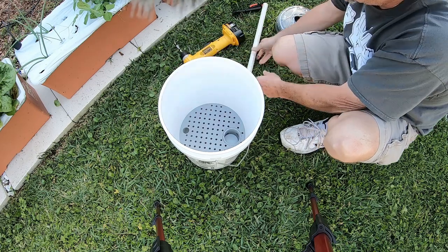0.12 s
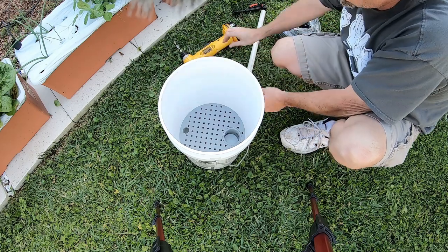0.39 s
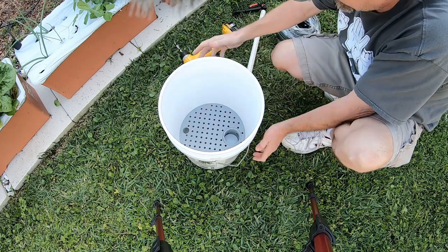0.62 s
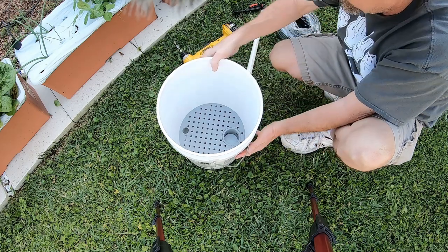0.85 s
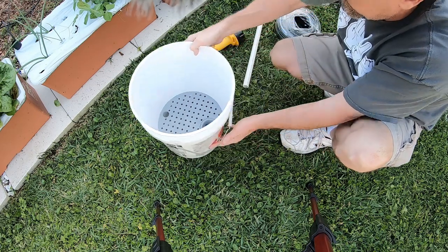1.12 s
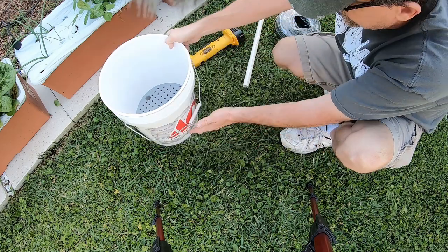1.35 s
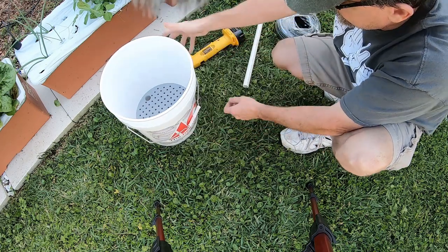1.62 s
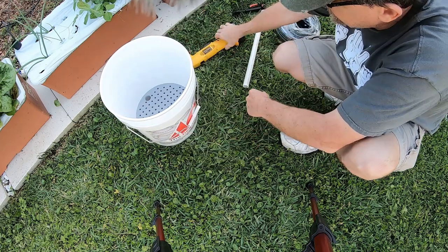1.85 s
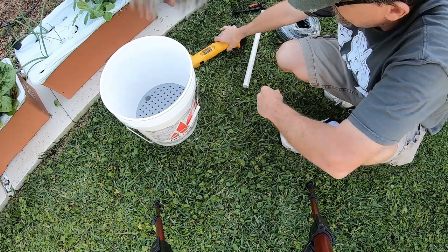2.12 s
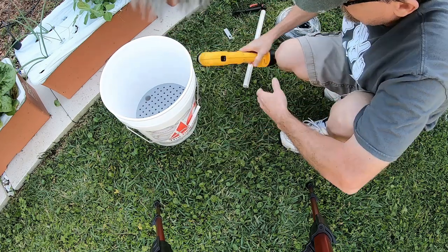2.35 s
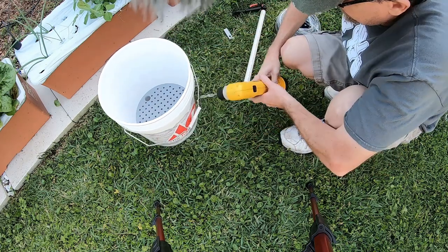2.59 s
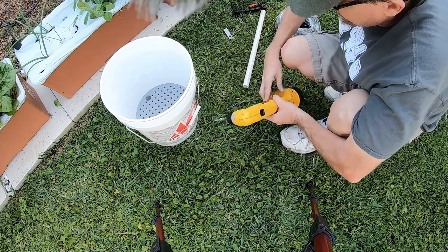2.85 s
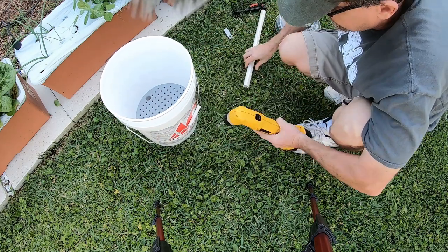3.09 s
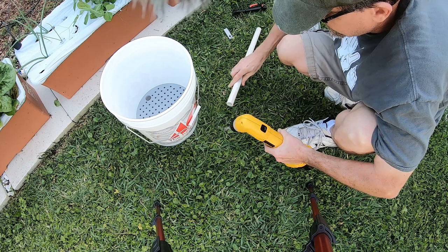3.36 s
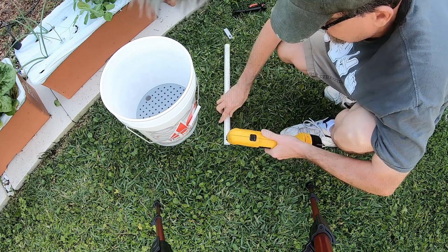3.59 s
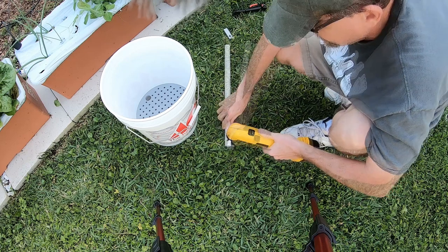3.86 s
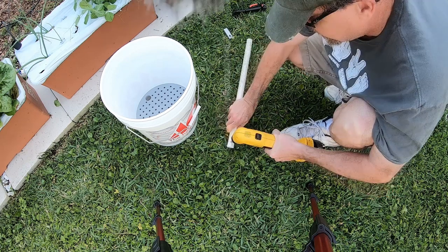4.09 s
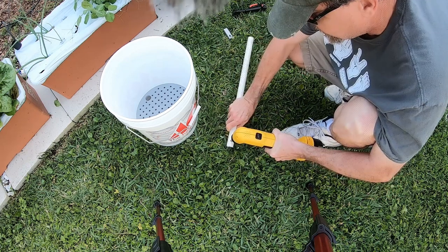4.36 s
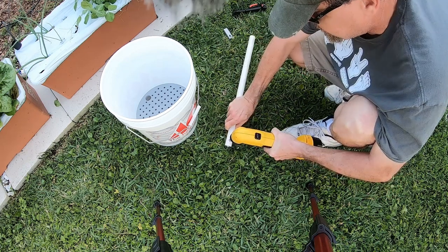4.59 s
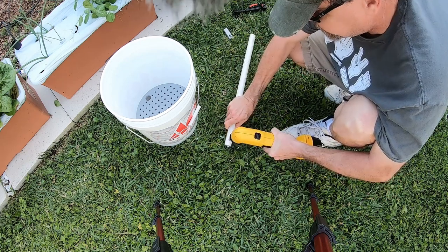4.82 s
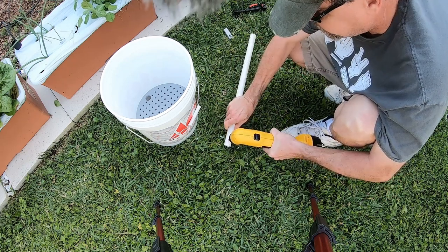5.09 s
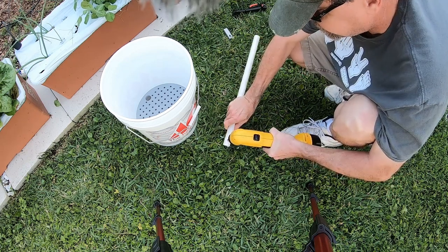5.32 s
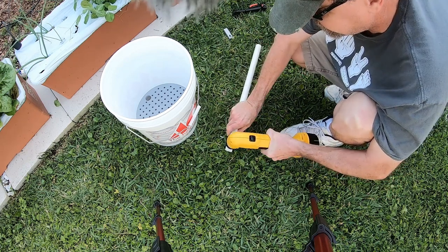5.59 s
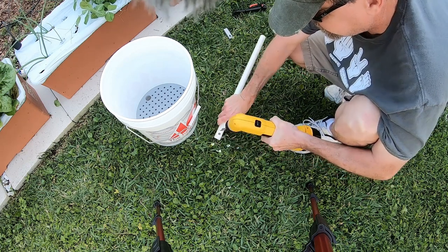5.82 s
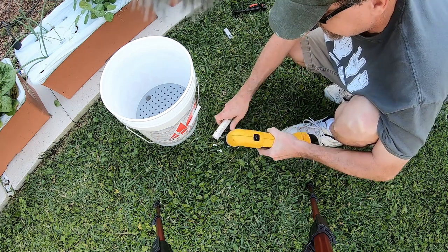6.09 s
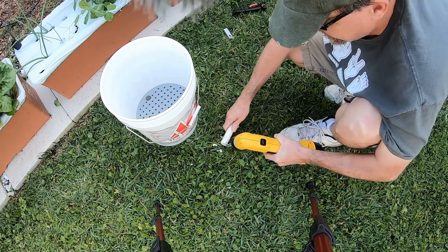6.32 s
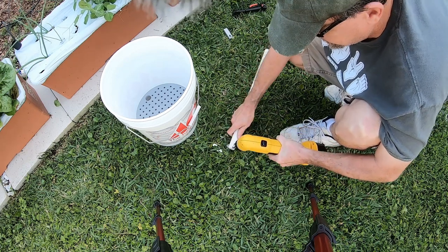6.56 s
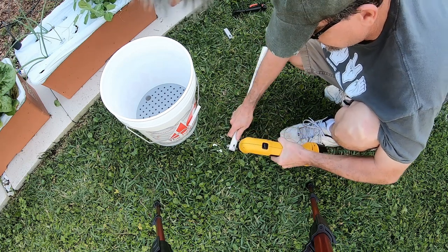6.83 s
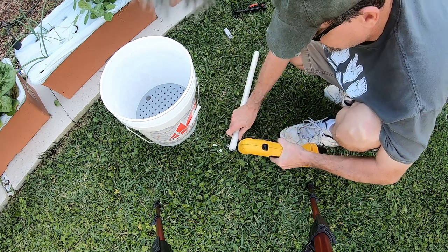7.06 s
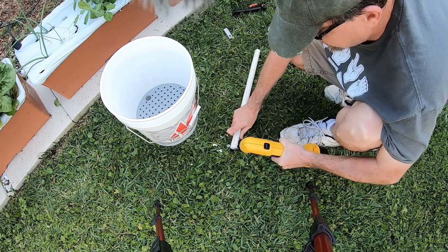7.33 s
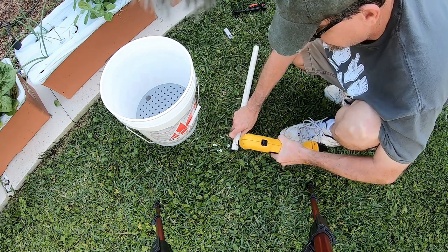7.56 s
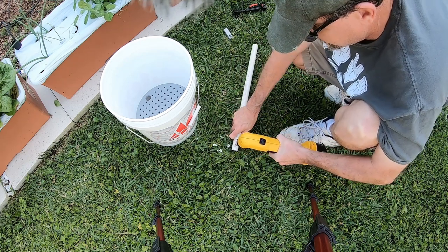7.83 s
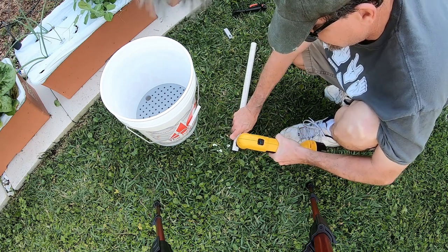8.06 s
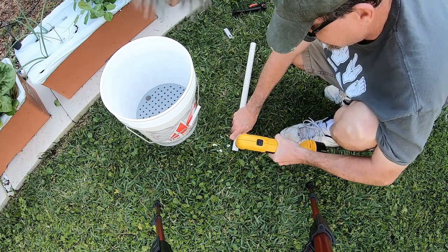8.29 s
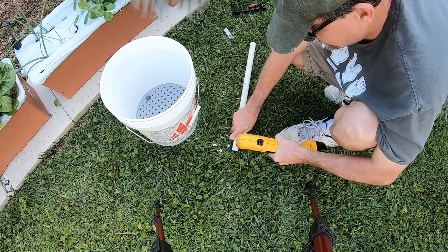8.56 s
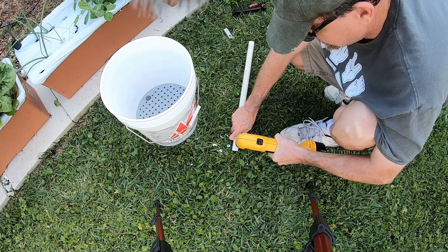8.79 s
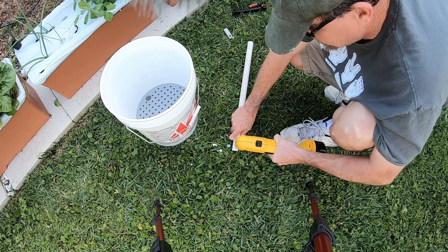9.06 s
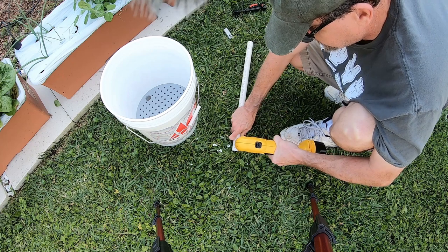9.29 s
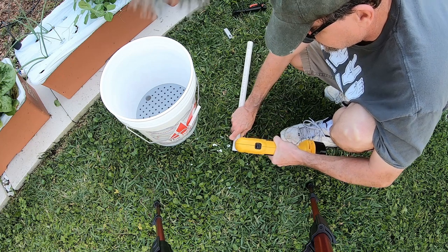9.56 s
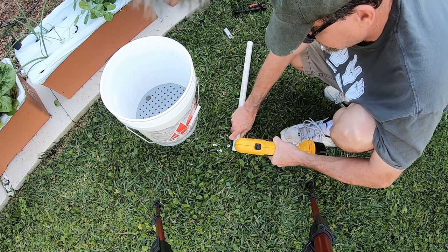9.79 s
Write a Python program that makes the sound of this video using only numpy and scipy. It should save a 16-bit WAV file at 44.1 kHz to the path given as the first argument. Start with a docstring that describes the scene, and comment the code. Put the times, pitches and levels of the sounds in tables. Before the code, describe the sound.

Outdoors on a lawn, close bare microphone, faint distant wash and machine hum, with low wind buffeting throughout. From 0.2 s grass and cloth crackle softly; at 0.9-1.7 s a plastic bucket gives hollow knocks and scuffs. A bright tap at 2.2 s leads to a loud, dense clatter of hard parts at 2.6-2.8 s, then small taps near 3 s and 3.5 s. At 3.96 s a low pop coincides with the abrupt start of a cordless drill, a loud, rough, high gear whine boring plastic. Wind rumble is strongest around 4-5.5 s. At 5.5-5.7 s the drill labours and its pitch dips, recovers, and it breaks through near 5.84 s. From 6 s it coasts, falling in pitch and loudness into a loose rattle, stopping around 8.6 s. Tiny ticks follow, and from 9 s it restarts slowly with thin electronic whines, growling upward until the end.

```python
"""A cordless drill on a lawn bores a plastic pipe, labours, breaks through, coasts down, later starts again:
shaft-beaten noise rings in the body under gear, commutator and shaft tones, with short gliding whine notes.
Before that a plastic bucket and tools are handled: ringing knocks, crackling rustle, one loud dense clatter.
Wind buffets the bare microphone over a distant wash and hum; one low pop sounds, a step that dies away; the
ground gives every near sound a short echo."""
import sys
import numpy as np
from scipy import signal
from scipy.io import wavfile
from scipy.ndimage import uniform_filter1d

SR = 44100
rng = np.random.default_rng(int(sys.argv[2]) if len(sys.argv) > 2 else 0)


def attenuation_scalar(level_db):
    """Turn a level in dB into a linear amplitude multiplier (20 dB per decade)."""
    decades = np.asarray(level_db, float) / 20
    return 10 ** decades


def log_audio(samples):
    """Write samples as a 16-bit WAV file to the path given in sys.argv[1]."""
    # one column per channel
    frames = np.atleast_2d(samples).T
    # limit to full scale, then quantise
    limited = np.clip(frames, -1, 1)
    pcm = np.round(limited * 32767).astype(np.int16)
    wavfile.write(sys.argv[1], SR, pcm)


N = 437472

# distant wash: hz, level_db_per_hz
YARD_SPECTRUM = [(88, -32.5), (150, -11.5), (439, -5.5), (534, -9), (624, -8), (745, -9), (1450, -12),
                 (1530, -12.5), (1830, -16.5), (5570, -19.5), (16000, -31.5)]
YARD_DB = -61.5
# hum of a far machine: pitch_hz, level_db
HUM_TONES = [(242.2, -75), (414.5, -75), (532.9, -75.5), (769.8, -76.5), (1120, -78), (1577, -74.5)]
# wind on the microphone: time_s, slow_pressure_db, rumble_db
WIND_CURVE = [(0.03, -10.5, -36), (0.5, -31.5, -59), (1.32, -34.5, -51), (1.43, -15, -42), (1.57, -13, -46),
              (1.84, -14.5, -31.5), (3.19, -11, -47), (3.5, -11.5, -46.5), (3.94, -15, -33),
              (4.21, -16.5, -29.5), (4.35, -26, -21.5), (4.62, -11.5, -23.5), (4.82, -15, -23.5),
              (5.42, -10, -28), (5.59, -16, -29.5), (6.14, -14, -46), (6.39, -23, -43.5),
              (6.91, -11, -38.5), (8.59, -24.5, -55.5), (8.89, -19.5, -54), (9.09, -29, -51.5),
              (9.56, -14.5, -52), (9.67, -17, -43), (9.91, -33, -56)]
# wind rumble: hz, level_db_per_hz
RUMBLE_SPECTRUM = [(11, -42), (18, 3.5), (65, -16.5), (102, -19.5), (300, -43.5), (390, -71), (660, -120)]
# low pop, a step that dies away: time_s, step_db, decay_s
STEP_POP = (3.9584, -5, 0.036)

# strokes over grass and cloth: peak_s, rise_s, fall_s, crisp_db, hollow_db; rise and fall span 20 dB
RUSTLE_STROKES = [(0.2, 0.054, 0.2, -58, -63), (0.286, 0.027, 0.027, -49.5, -69),
                  (1.03, 0.2, 0.25, -73, -52), (1.116, 0.26, 0.16, -62.5, -53), (1.178, 0.1, .07, -73, -46),
                  (1.399, 0.26, .2, -50, -43), (1.62, 0.06, 0.19, -64.5, -46.5),
                  (1.89, 0.065, 0.39, -79, -59), (2.191, 0.036, 0.24, -57.5, -64),
                  (2.979, 0.11, 0.13, -59.5, -61), (3.21, 0.052, 0.066, -58.5, -65),
                  (3.375, 0.22, 0.23, -57, -65), (3.719, 0.083, 0.086, -56.5, -67),
                  (3.941, 0.053, 0.019, -59, -63)]
# crackle of grass and cloth: hz, level_db_per_hz
RUSTLE_SPECTRUM = [(880, -36), (1500, -9), (2510, -7.5), (4920, -9), (5830, -18.5), (7760, -11.5),
                   (16000, -20)]
# hollow scuff of the bucket: hz, level_db_per_hz
SCUFF_SPECTRUM = [(120, -30), (220, 12.0), (340, -7.0), (520, 3.0), (900, 1.5), (2700, -9.5), (4500, -33.0)]

# blows within the clatter: start_s, relative_db
CLATTER_BLOWS = [(2.59, 1.5), (2.617, 3), (2.637, -8), (2.65, -9), (2.67, -13.5), (2.701, -7), (2.728, -3),
                 (2.732, -10.5), (2.74, -9.5), (2.805, -13), (2.821, -11.5)]
# clatter: time_s, level_db, treble_over_level_db
CLATTER_CURVE = [(2.588, -18, -6), (2.598, -16, -18), (2.69, -17.5, -25.5), (2.7, -25.5, -28.5),
                 (2.706, -21, -19), (2.726, -22, -15.5), (2.742, -19, -16.5), (2.798, -38, -22.5),
                 (2.9, -68, -4.5)]
# clatter: hz, level_db_per_hz
CLATTER_SPECTRUM = [(88, -43), (150, -29.5), (213, -2), (398, -12.5), (759, 0), (2220, -1.5), (4080, -12),
                    (5570, -29.5), (12400, -32), (16000, -46.5)]
# clatter resonances: centre_hz, width_hz, gain_db
CLATTER_MODES = [(219, 31, 3.5), (512, 14, 13.5), (736, 29, 3.5), (950, 77, 6.5), (1550, 87, 10),
                 (2050, 200, 2.5), (2420, 160, 8), (2950, 100, 4), (7900, 746, 8.5)]
# parts that ring on: pitch_hz, t60_s, db_per_sample_of_ring
CLATTER_TAIL_MODES = [(771, .2, -48.5), (1590, .1, -51.5), (2560, 0.17, -52)]

# knocks on bucket and tools: start_s, peak_db, hollow_db, bright_db, contact_s
KNOCK_EVENTS = [(0.861, -27, -14, -26, 0.007), (0.892, -26.5, -19, -21, 0.0042),
                (0.932, -23.5, -16, -43, 0.0079), (0.962, -33.5, -15.5, -23, 0.013),
                (1.137, -42, -16, -9, 0.0066), (1.166, -43, -28, -13, 0.004), (1.178, -31, 20, -24, 0.012),
                (1.408, -24.5, 9, -18, 0.013), (1.432, -23.5, -1, -32, 0.0075),
                (1.586, -28.5, -20, -16, 0.017), (1.636, -28, 0.5, -9.5, 0.012),
                (1.642, -24, -24, -18, 0.0051), (2.201, -32.5, -9, 14, 0.005),
                (2.564, -37.5, -13.5, 3.5, 0.0029), (2.912, -43, -1.5, 0, 0.013),
                (2.945, -36.5, -3.5, 4.5, 0.0075), (2.963, -33.5, -8, 2, 0.0055),
                (3.005, -42.5, -3, -5, 0.0062), (3.01, -33.5, 2, 8, 0.0039), (3.507, -39.5, 3, -5, 0.006)]
# modes of the plastic: pitch_hz, level_db, t60_s
PLASTIC_MODES = [(216, -11, 0.084), (499, -10.5, 0.12), (805, -4.5, 0.07), (869, 4.5, 0.028),
                 (1120, -1, 0.02), (1420, 1, 0.0086), (1553, -7, 0.036), (1900, -4, 0.011),
                 (2297, -2, 0.012), (2858, 1, 0.011), (4200, 12, 0.0017), (8030, -3.5, 0.0072),
                 (11100, -7.5, .004)]
# ticks of the trigger: start_s, relative_db, pitch_hz
TRIGGER_TICKS = [(8.66, -58, 8050), (8.955, -56, 3170), (9.033, -50.5, 4000), (9.036, -53, 4990),
                 (9.186, -47, 9000), (9.19, -59, 10520), (9.297, -45, 3900)]

# whine at part throttle; the first note is a gear sideband near break-through:
# start_s, length_s, from_hz, to_hz, level_db
WHINE_NOTES = [(5.787, 0.13, 4200, 4300, -42), (5.924, 0.19, 4860, 4750, -38),
               (9.045, 0.18, 4340, 4570, -70), (9.299, 0.2, 4220, 4200, -51), (9.49, 0.11, 4200, 4710, -46),
               (9.576, 0.12, 3790, 3900, -42), (9.632, 0.31, 4600, 4590, -48)]
WHINE_GLIDE_SHARE, WHINE_EDGE_S, WHINE_OVERTONES_DB = 0.4, 0.0072, -69  # glide time as share of note

# trigger held, two runs (boring, slow second start): time_s, mesh_hz, load_db, gear_tones_db
DRIVEN_RUNS = [
    [(3.96, 4644, -3.5, -2), (4.4, 4615, -2, 6.5), (4.8, 4574, 0, 5), (5.4, 4558, 0.5, 6.5),
     (5.47, 4374, 2, 6.5), (5.535, 3980, 4, 7), (5.57, 4174, 0, 6), (5.615, 4151, 2.5, 4),
     (5.65, 3933, 1.5, 8), (5.72, 4270, 0.5, 3), (5.8, 4517, 1, -2), (5.9, 4608, 0.5, 0),
     (5.97, 4625, 0.5, -9)],
    [(9.02, 59.5, 0, -12), (9.05, 353, 3, 0), (9.3, 800, 2.5, -1), (9.58, 1700, 1, 5), (9.67, 2450, 2, 7),
     (9.73, 2760, 0, 2), (9.83, 2887, 0.5, -1), (9.92, 3230, 3, 2)],
]
MESH_PER_TURN = 12.56
COAST_S, DRAG_HZ = 1.93, 4343  # air drag time constant; bearing friction as a mesh speed
STALL_HZ = 332  # mesh speed below which friction stops the coasting chuck
CURRENT_OFF_S, COAST_TONES_DB, TONES_FADE_HZ = 0.15, 5, 2050  # gear tones fade below this mesh speed
ONSET_DB, ONSET_S = 5, 0.0058  # louder first instant

# tones of shaft, commutator and gears: multiple_of_shaft_speed
TONE_ORDERS = [1, 1.19, 2, 2.145, 2.28, 5, 7.22, 11.56, 12.56, 13.5, 20, 24, 25.12, 36.56, 37.68]
# one row per order: level_over_drill_db, width_hz, change_without_full_current_db
ORDER_LEVELS = [(-18, 1.6, 1.5), (-41, 2.3, 23), (-19, 1.97, -2.5), (-29, 9.8, -10), (-17, 2.8, -14),
                (-21, 8, 0), (-14.5, 12, -26), (-22.5, 16.5, -4), (-13.5, 14, -1), (-27, 15, -24.5),
                (-24, 4, -15), (-19, 2.8, -13), (-21, 8.7, -2), (-23, 10, -17), (-33.5, 40, -12.5)]
# commutator: multiple_of_shaft_speed
COMMUTATOR_ORDERS = (20, 24)
COMMUTATOR_DB_PER_LOAD_DB = -3.5  # tones sink as the bit bites
# lower, upper mesh sideband: swell_db_per_unit_speed_sag
SIDEBAND_SWELL_DB = (60, 40)
BACKLASH_DB = 2.5  # gear tone flicker: without full current the teeth touch on and off
SHELL_SHARE, LOOSE_SHARE = 1.15, 0.71  # how far tones follow the shell, driven and loose

DRILL_DB, DB_PER_DECADE = -29.5, 30.5  # full-speed level before load; fall with speed
TREBLE_DB, TREBLE_KNEE_HZ, TREBLE_DB_PER_DECADE = -4, 2320, 18  # treble thins below the knee mesh speed
THROUGH_S, THROUGH_SPAN_S = 5.84, 0.09  # bit comes through the pipe wall
# gear and brush noise: hz, level_db_per_hz
HOUSING_SPECTRUM = [(150, -67), (250, -22), (360, -9), (484, -16), (831, -3.5), (1020, -6), (1760, -6.5),
                    (4490, -2), (5930, -15), (12800, -10), (15800, -20), (16300, -38.5)]
# drill body while boring: centre_hz, width_hz, gain_db
SHELL_MODES = [(800, 110, 7.5), (1800, 320, 7.5), (2720, 290, 4.5), (3740, 210, -3), (4960, 310, 5.5),
               (7600, 3100, 7.5), (9000, 3300, 2.5)]
# drill body, bit free of the pipe: centre_hz, width_hz, gain_db
FREE_SHELL_MODES = [(780, 105, 7.5), (1150, 100, 5), (1550, 110, 6), (2580, 350, 3.5), (3900, 430, 0),
                    (4970, 420, 3.5), (8180, 1460, 13)]
# slow gears rattling in the shell: hz, level_db_per_hz
RATTLE_SPECTRUM = [(200, -70), (290, -27), (450, -14), (794, -2.5), (979, -9.5), (1490, -11.5),
                   (1830, -5.5), (2330, -13), (2660, -4), (3140, -5.5), (4560, -3), (5200, -6.5),
                   (6240, -20), (8170, -12), (11700, -12), (16000, -24.5)]
# rattle resonances: centre_hz, width_hz, gain_db
RATTLE_MODES = [(2760, 200, 3), (4700, 940, 3), (5550, 310, 1.5), (6800, 350, 10.5), (7950, 600, 0.5),
                (9000, 380, 5), (10400, 500, 5)]
RATTLE_ONSET = 0.89  # share of rattle per share of speed lost
# drill echo off the lawn, shifting as the tool is lifted: time_s, comb_spacing_hz, echo_share
DRILL_ECHO_CURVE = [(3.9, 929, 0.13), (5.85, 898, 0.072), (6.05, 822, 0.13), (6.2, 844, 0.17),
                    (6.36, 950, 0.23), (6.85, 965, 0.17), (9.92, 930, 0.2)]


def read(points, hz):
    """Value of a spectrum table on a log-frequency axis."""
    f, value = np.transpose(points)
    return np.interp(np.log(hz + 1), np.log(f + 1), value)


def lift(modes, hz):
    """Gain in dB of resonances standing on a flat spectrum."""
    return sum(db / (1 + (2 * (hz - f) / width) ** 2) for f, width, db in modes)


def evened(x):
    """Scales to rms 1."""
    return x / np.sqrt(np.mean(x ** 2) + 1e-20)


def along(rows, outside=-120.):
    """Columns of a curve at every sample; None holds the end values."""
    s, *columns = np.transpose(rows)
    return [np.interp(np.arange(N) / SR, s, c, outside, outside) for c in columns]


def colour(x, points, modes=()):
    """Causal minimum-phase filter with the given spectrum and resonances, rms 1."""
    hz = np.abs(np.fft.fftfreq(8192, 1 / SR))
    log_gain = (read(points, hz) + lift(modes, hz)) * np.log(10) / 20
    response = np.exp(np.conj(signal.hilbert(log_gain)))
    taps = np.fft.ifft(response).real[:4096]
    return evened(signal.oaconvolve(x, taps)[:N])


def split(x, hz):
    """Low and high part."""
    low = signal.sosfiltfilt(signal.butter(2, hz, fs=SR, output="sos"), x)
    return low, x - low


def slow(hz):
    """Random drift up to about hz, rms 1."""
    return evened(signal.sosfilt(signal.butter(2, hz, fs=SR, output="sos"), rng.standard_normal(N)))


def grains(per_s, spread_db):
    """Sparse clicks of random sign; a few are large."""
    size = attenuation_scalar(spread_db * np.minimum(rng.exponential(1, N), 5))
    return size * rng.standard_normal(N) * (rng.random(N) < per_s / SR)


def wavering(turns, width_hz, depth_db=3):
    """A tone whose phase and height wander, rms 1."""
    wander = np.cumsum(rng.standard_normal(N)) * np.sqrt(2 * np.pi * width_hz / SR)
    height = attenuation_scalar(depth_db * (slow(25) + 0.42 * slow(1.9)))
    return evened(height * np.cos(2 * np.pi * turns + uniform_filter1d(wander, 200)))


def ground(x, delay_s=0.0014, share=0.052):
    """One delayed reflection off the lawn combs the sound."""
    late = np.interp(np.arange(N) - delay_s * SR, np.arange(N), x, 0)
    return (x + share * late) / np.sqrt(1 + share ** 2)


def yard():
    """Distant wash of drifting coloured noise and a faint hum of wavering tones."""
    t = np.arange(N) / SR
    hum = sum(attenuation_scalar(db) * wavering(hz * t, 2, 1.3) for hz, db in HUM_TONES)
    wash = colour(rng.standard_normal(N), YARD_SPECTRUM)
    return attenuation_scalar(YARD_DB + 0.34 * slow(1.9)) * wash + hum


def wind_and_pop():
    """Slow pressure swings and a lumpy rumble of wind; one pop, a step that dies away, replaces the swings."""
    slow_db, rumble_db = along(WIND_CURVE, None)
    band = signal.butter(3, [1.5, 8], "band", fs=SR, output="sos")
    swing = evened(signal.sosfilt(band, rng.standard_normal(N)))
    lumps = attenuation_scalar(2.4 * slow(20.0))
    rumble = evened(lumps * colour(rng.standard_normal(N), RUMBLE_SPECTRUM))
    s, db, decay_s = STEP_POP
    t = np.arange(N) / SR - s
    near_pop = np.exp(-(t / decay_s) ** 2)
    pop = attenuation_scalar(db) * np.sign(t) / 2 * near_pop
    return attenuation_scalar(slow_db) * swing * (1 - near_pop) + attenuation_scalar(rumble_db) * rumble + pop


def rustle():
    """Fine crackle of grass and cloth, with a hollow scuff of the bucket under it."""
    crackle = colour(grains(9000, 1.9), RUSTLE_SPECTRUM)
    scuff = colour(grains(1300, 1.4), SCUFF_SPECTRUM)
    t = np.arange(0, N / SR, 1 / 500)  # envelope grid
    peak_s, rise_s, fall_s, crisp_db, hollow_db = (c[:, None] for c in np.transpose(RUSTLE_STROKES))
    shape_db = -20 * np.maximum((peak_s - t) / rise_s, (t - peak_s) / fall_s)

    def envelope(db):
        """Power sum of all strokes at every sample."""
        return np.interp(np.arange(N) / SR, t, np.linalg.norm(attenuation_scalar(db + shape_db), axis=0))

    return envelope(crisp_db) * crackle + envelope(hollow_db) * scuff


def clatter():
    """Loose hard parts rattle densely; each blow renews the rattle, and the ring shifts as the parts tumble."""
    level_db, treble_db = along(CLATTER_CURVE)
    t, push = np.arange(N) / SR, np.full(N, 0.35)
    for s, db in CLATTER_BLOWS:
        rise = np.clip((t - s) / 0.0034, 0, 1)
        push += attenuation_scalar(db + 5.5) * np.exp(-np.maximum(t - s, 0) / 0.0044) * rise
    push /= uniform_filter1d(push, 2600)
    tumble = np.pi / 4 * (1 + np.tanh(1.75 * slow(26)))
    shifted_modes = [(hz * 0.9, width, db) for hz, width, db in CLATTER_MODES]
    ring = colour(grains(7000, 2.2), CLATTER_SPECTRUM, CLATTER_MODES)
    shifted_ring = colour(grains(7000, 2.2), CLATTER_SPECTRUM, shifted_modes)
    low, high = split(np.cos(tumble) * ring + np.sin(tumble) * shifted_ring, 5000)
    rattle = attenuation_scalar(level_db) * push * (evened(low) + attenuation_scalar(treble_db) * evened(high))
    tail_s = t[:SR // 2]
    tail = sum(attenuation_scalar(db - 60 * tail_s / t60) * np.sin(2 * np.pi * hz * tail_s)
               for hz, t60, db in CLATTER_TAIL_MODES)
    return rattle + signal.oaconvolve(rattle, tail)[:N]


def knocks():
    """Each knock is many contacts within milliseconds, ringing detuned modes of the plastic."""
    out, t = np.zeros(N + 9000), np.arange(6000) / SR
    contact_t = t[:1800]
    hz, mode_db, mode_t60 = (c[:, None] for c in np.transpose(PLASTIC_MODES))
    for s, db, hollow_db, bright_db, contact_s in KNOCK_EVENTS:
        detune, phase = rng.uniform(0.96, 1.04, hz.shape), rng.random(hz.shape)
        tilt_db = np.interp(np.log(hz), np.log([800, 1800, 5000]), [hollow_db, -4, bright_db])
        decay_db = 60 * t / mode_t60
        modes = attenuation_scalar(mode_db + tilt_db - decay_db) * np.sin(2 * np.pi * (hz * detune * t + phase))
        ring = modes.sum(0) * np.minimum(t / 0.00019, 1)
        # the many short upper modes merge into a crack
        burst = rng.standard_normal(len(t)) * np.exp(-t / 0.000287)
        ring += 0.45 * attenuation_scalar(bright_db) * signal.lfilter([1, -1], [1, -1.1, 0.3], burst)
        contacts = rng.standard_normal(1800) * (rng.random(1800) < 0.2)
        contacts *= np.exp(-contact_t / max(contact_s, 0.001))
        contacts *= np.minimum(contact_t / (0.17 * contact_s) + 0.26, 1)
        sound = np.convolve(ring, contacts)
        out[round(s * SR):][:len(sound)] += attenuation_scalar(db) * sound / abs(sound).max()
    return out[:N]


def trigger():
    """Tiny bright ticks, each a short rough ring."""
    out, t = np.zeros(N), np.arange(1500) / SR
    for s, db, hz in TRIGGER_TICKS:
        rough = 1 + 4.6 * uniform_filter1d(rng.standard_normal(len(t)), 24)
        envelope = t / 0.0042 * np.exp(1 - t / 0.0028)
        out[round(s * SR):][:len(t)] += attenuation_scalar(db) * envelope * rough * np.sin(2 * np.pi * hz * t)
    return out


def whine():
    """A gear sideband near break-through, then partials of the chopped motor current; each note glides."""
    t, out = np.arange(N) / SR, np.zeros(N)
    for s, length_s, from_hz, to_hz, db in WHINE_NOTES:
        on = np.clip(np.minimum(t - s, s + length_s - t) / WHINE_EDGE_S, 0, 1)
        glide = np.exp(-np.maximum(t - s, 0) / (WHINE_GLIDE_SHARE * length_s))
        turns = np.cumsum(to_hz + (from_hz - to_hz) * glide) / SR
        overtones = np.cos(2 * np.pi * 2 * turns) + 0.5 * np.cos(2 * np.pi * 3 * turns)
        out += on * (attenuation_scalar(db) * wavering(turns, 19.7, 3.2) + attenuation_scalar(WHINE_OVERTONES_DB) * overtones)
    return out


def motor():
    """Mesh speed, load, gear tones and share of full current gone; coasting obeys air drag and friction."""
    t, (first, second) = np.arange(N) / SR, DRIVEN_RUNS
    let_go_s, top_hz, load_end_db, tones_end_db = first[-1]
    coast_hz = (top_hz + DRAG_HZ) * np.exp(-(t - let_go_s) / COAST_S) - DRAG_HZ
    coast_hz = coast_hz * np.clip((coast_hz - STALL_HZ) / 100 + 1, 0, 1)
    coasting = (t > let_go_s) & (t < second[0][0])
    idle = np.clip((t - let_go_s) / CURRENT_OFF_S, 0, 1)
    mesh_hz, load_db, tones_db = np.add(along(first, 0.), along(second, 0.))
    mesh_hz = np.where(coasting, coast_hz, mesh_hz)
    fade_db = 40 * np.log10(np.clip(mesh_hz / TONES_FADE_HZ, 0.5, 1))
    coast_tones_db = tones_end_db + (COAST_TONES_DB - tones_end_db) * idle + fade_db
    tones_db = np.where(coasting, coast_tones_db, tones_db)
    since_s = np.maximum(t - first[0][0], 0)
    load_db = np.where(coasting, load_end_db, load_db) + ONSET_DB * np.exp(-since_s / ONSET_S)
    return mesh_hz, load_db, tones_db, idle


def drill_noise(mesh_hz, turns, treble_db):
    """Tooth and brush noise, beaten by shaft and mesh, rings in the shell; slow gears rattle."""
    t = np.arange(N) / SR
    beat = 1 + 0.18 * np.cos(2 * np.pi * turns) + 0.6 * np.cos(2 * np.pi * MESH_PER_TURN * turns)
    chatter = attenuation_scalar(0.72 * slow(71))  # the bit bites unevenly
    drive = beat * chatter * (rng.standard_normal(N) + 0.073 * grains(1500, 3.4))
    free = np.clip((t - THROUGH_S) / THROUGH_SPAN_S, 0, 1) * (t < DRIVEN_RUNS[1][0][0])
    boring = colour(drive, HOUSING_SPECTRUM, SHELL_MODES)
    body = (1 - free) * boring + free * colour(drive, HOUSING_SPECTRUM, FREE_SHELL_MODES)
    rattle = np.clip(RATTLE_ONSET * (1 - mesh_hz / mesh_hz.max()), 0, 1)
    noise = (1 - rattle) * body + rattle * colour(drive, RATTLE_SPECTRUM, RATTLE_MODES)
    low, high = split(noise, 6820)
    return attenuation_scalar(-0.4) * evened(low) + attenuation_scalar(treble_db - 0.13) * evened(high)


def drill_tones(shaft_hz, turns, load_db, tones_db, idle):
    """Shaft orders sing; a gliding tone swells and sinks with the resonances of the shell."""
    out, top = np.zeros(N), shaft_hz.argmax()
    driven = np.arange(N) / SR < DRIVEN_RUNS[0][-1][0]
    sag = np.minimum(1 - shaft_hz / shaft_hz.max(), 0.15) * driven
    tones_db = tones_db + BACKLASH_DB * idle * slow(22)
    for order, (db, width_hz, idle_db) in zip(TONE_ORDERS, ORDER_LEVELS):
        hz = order * shaft_hz
        shell_db = read(HOUSING_SPECTRUM, hz) + lift(SHELL_MODES, hz)
        loose_db = read(RATTLE_SPECTRUM, hz) + lift(RATTLE_MODES, hz)
        body_db = SHELL_SHARE * (1 - idle) * (shell_db - shell_db[top])
        body_db += LOOSE_SHARE * idle * (loose_db - loose_db[top])
        if order in COMMUTATOR_ORDERS:
            source_db = COMMUTATOR_DB_PER_LOAD_DB * load_db
        else:
            source_db = tones_db * (order > 10)
        source_db = source_db + idle_db * idle
        if 0.5 < abs(order - MESH_PER_TURN) < 1.1:
            source_db = source_db + SIDEBAND_SWELL_DB[int(order > MESH_PER_TURN)] * sag
        out += attenuation_scalar(db + body_db + source_db) * wavering(order * turns, width_hz, min(0.41 * order, 1.6))
    return out


def drill():
    """Noise and tones follow the motor: level and treble fall with speed, level rises with load."""
    mesh_hz, load_db, tones_db, idle = motor()
    decades = np.log10(mesh_hz / mesh_hz.max() + 1e-4)
    level_db = DRILL_DB + load_db + DB_PER_DECADE * decades
    below_knee = np.minimum(decades + np.log10(mesh_hz.max() / TREBLE_KNEE_HZ), 0)
    treble_db = TREBLE_DB + TREBLE_DB_PER_DECADE * below_knee
    shaft_hz = mesh_hz / MESH_PER_TURN
    turns = np.cumsum(shaft_hz) / SR
    noise = drill_noise(mesh_hz, turns, treble_db)
    return attenuation_scalar(level_db) * (noise + drill_tones(shaft_hz, turns, load_db, tones_db, idle))


def scene():
    """All sources at the microphone; near ones with their ground echo."""
    spacing_hz, share = along(DRILL_ECHO_CURVE, None)
    tool = ground(drill(), 1 / spacing_hz, np.clip(share, 0, 1))
    near = ground(whine() + trigger() + knocks() + clatter() + rustle())
    return (tool + near + wind_and_pop() + yard())[None]


def low_pass(x):
    """Removes everything above the highest recorded frequency."""
    return signal.sosfilt(signal.butter(12, 16420, fs=SR, output="sos"), x)


def record(dry):
    """The input stage rounds off the largest peaks."""
    mix = 0.98 * np.tanh(dry / 0.96)
    return low_pass(mix)


dry = scene()
out = record(dry)
log_audio(out)
```